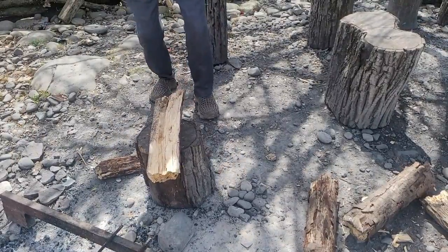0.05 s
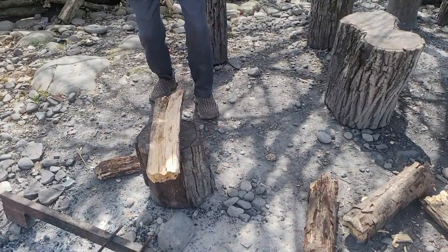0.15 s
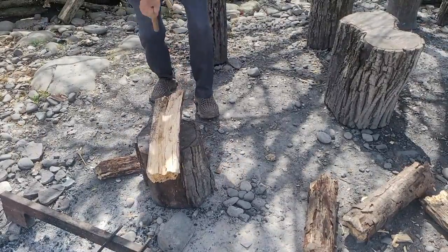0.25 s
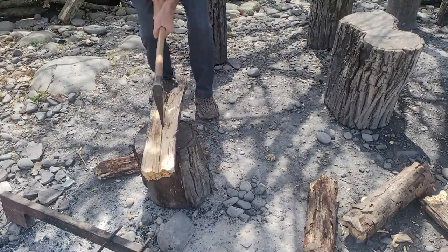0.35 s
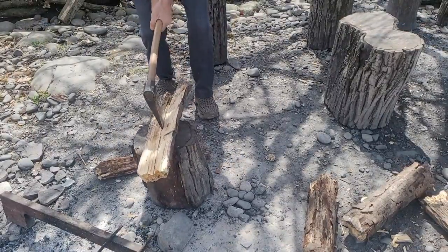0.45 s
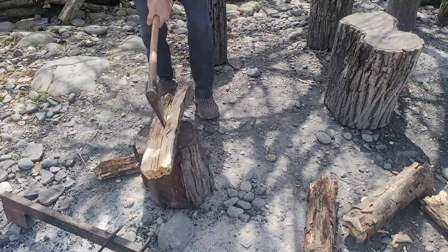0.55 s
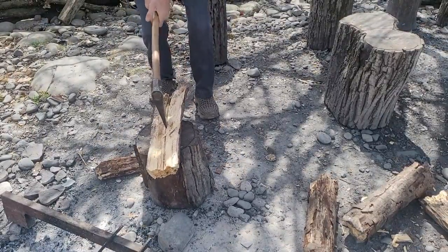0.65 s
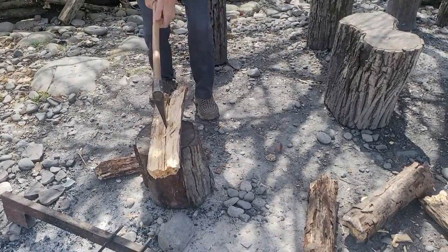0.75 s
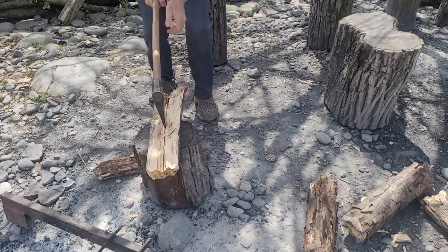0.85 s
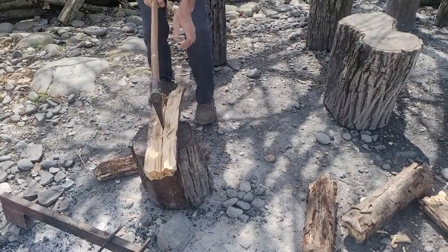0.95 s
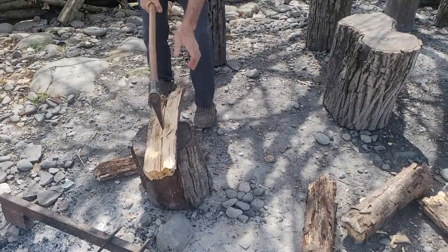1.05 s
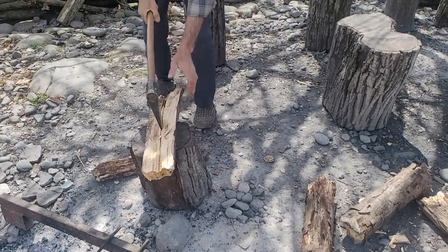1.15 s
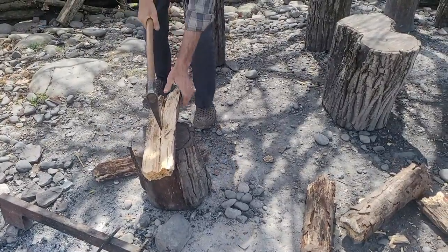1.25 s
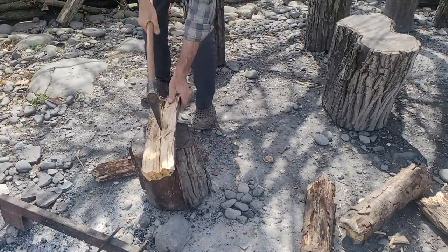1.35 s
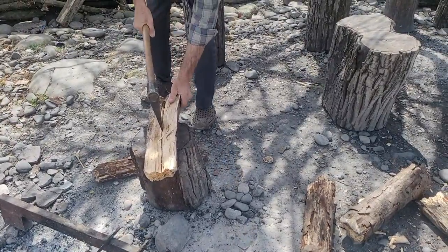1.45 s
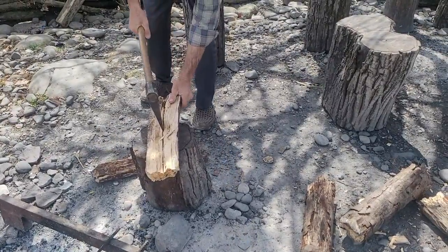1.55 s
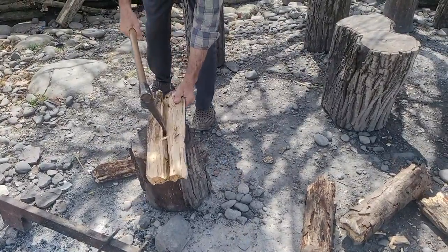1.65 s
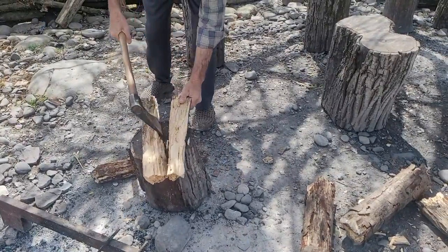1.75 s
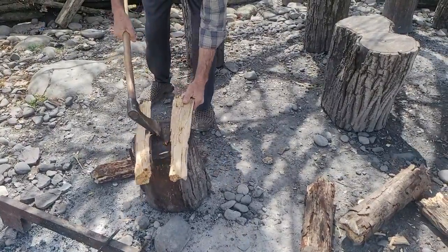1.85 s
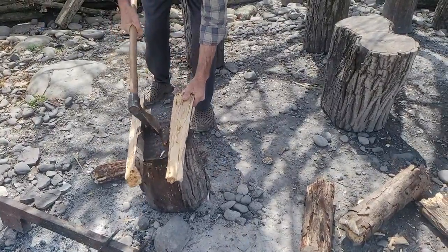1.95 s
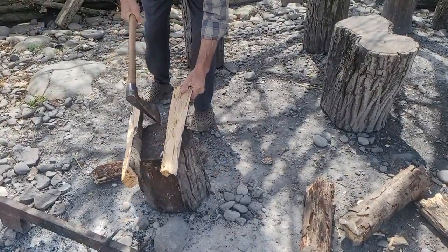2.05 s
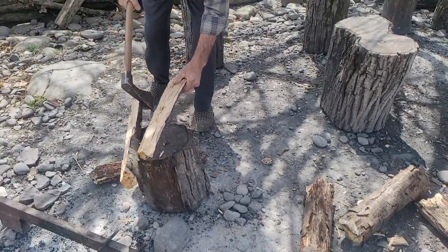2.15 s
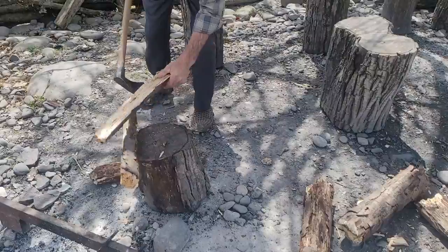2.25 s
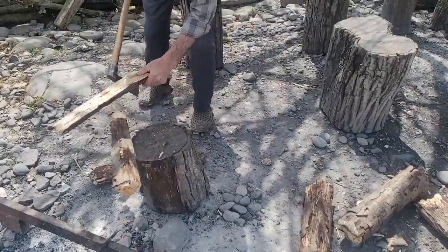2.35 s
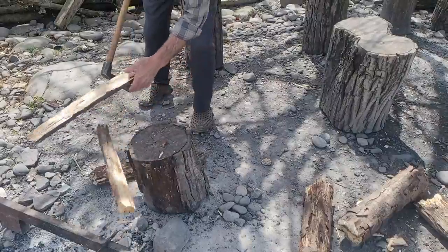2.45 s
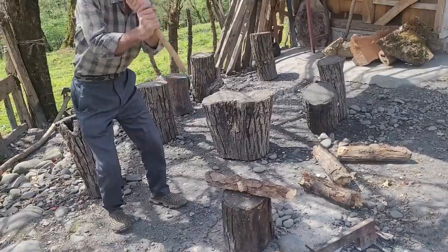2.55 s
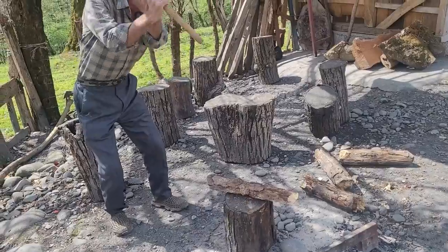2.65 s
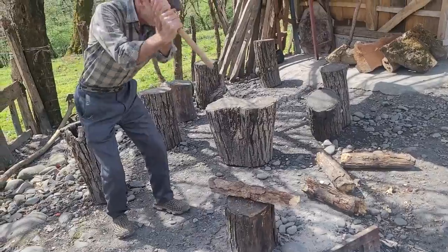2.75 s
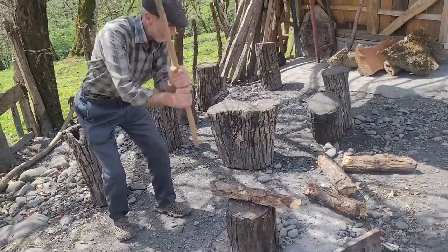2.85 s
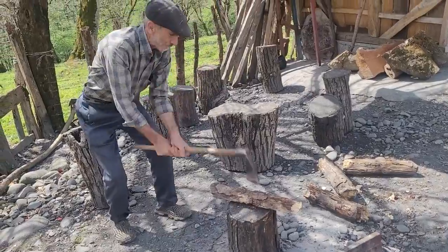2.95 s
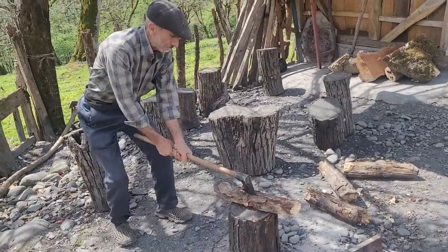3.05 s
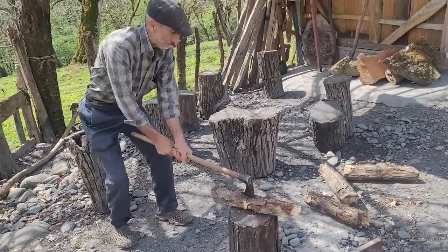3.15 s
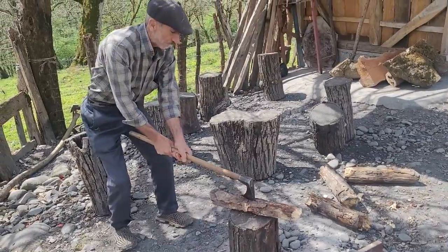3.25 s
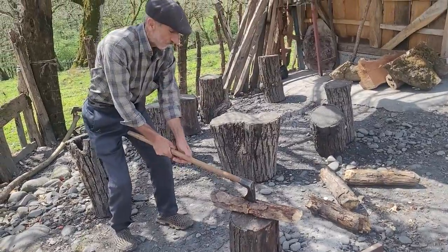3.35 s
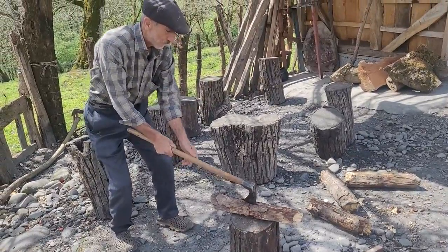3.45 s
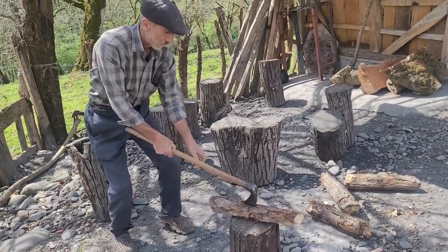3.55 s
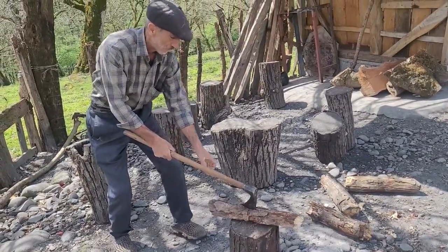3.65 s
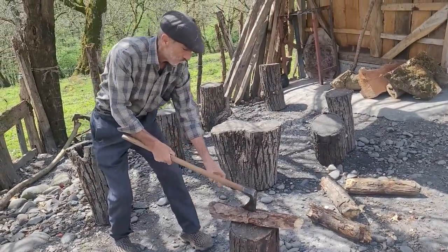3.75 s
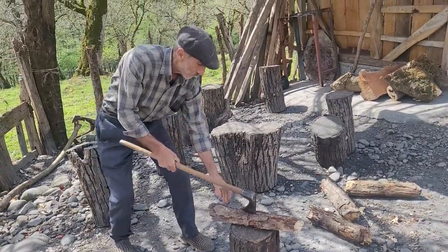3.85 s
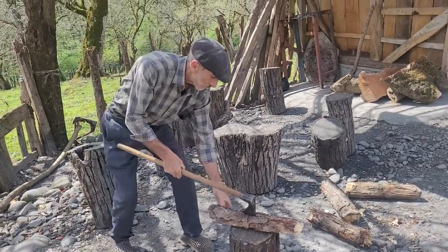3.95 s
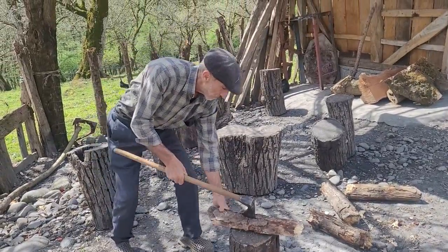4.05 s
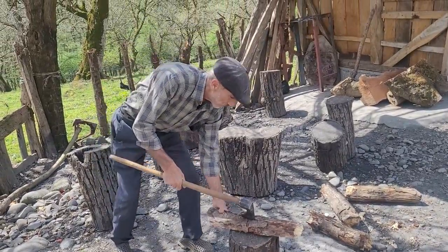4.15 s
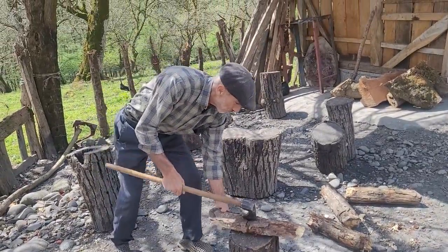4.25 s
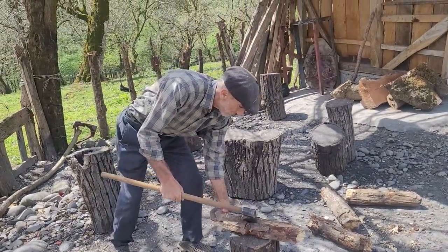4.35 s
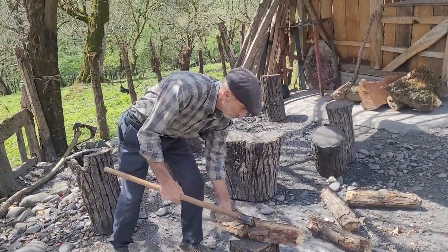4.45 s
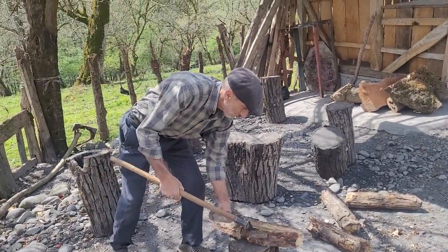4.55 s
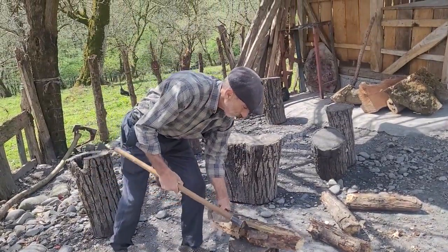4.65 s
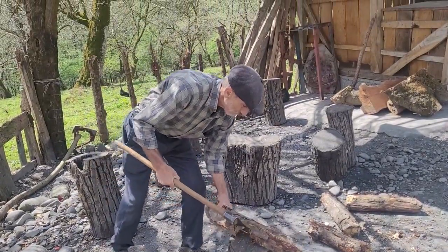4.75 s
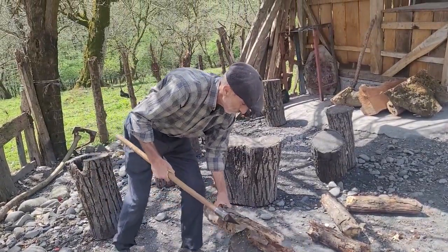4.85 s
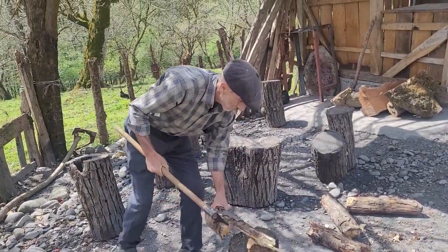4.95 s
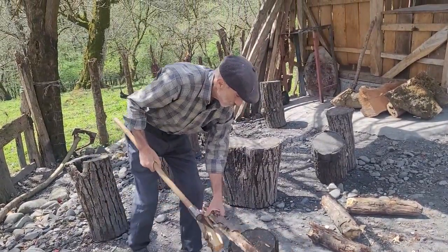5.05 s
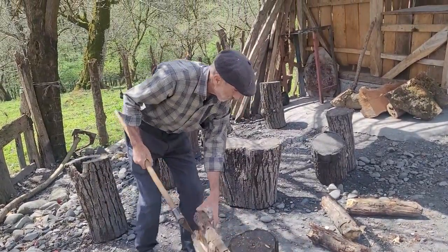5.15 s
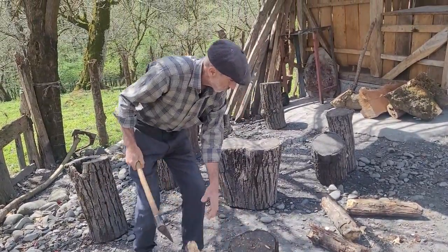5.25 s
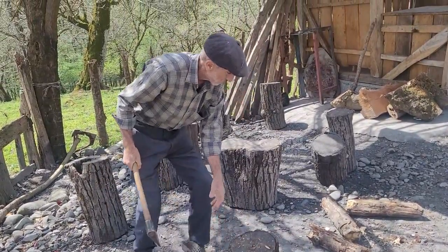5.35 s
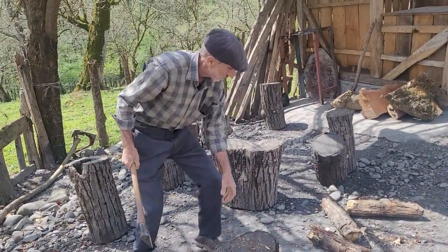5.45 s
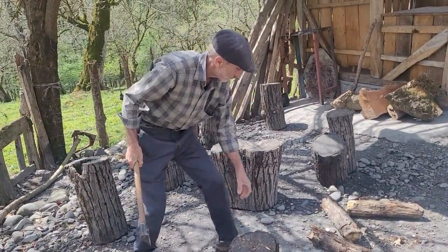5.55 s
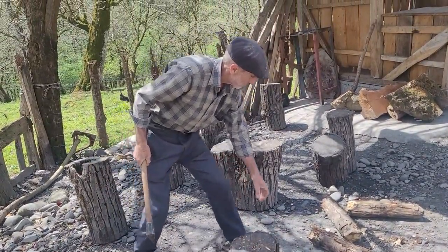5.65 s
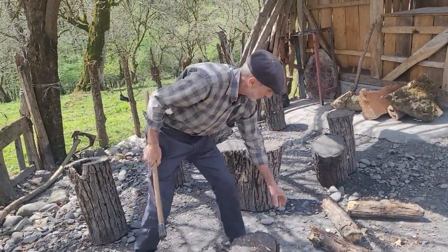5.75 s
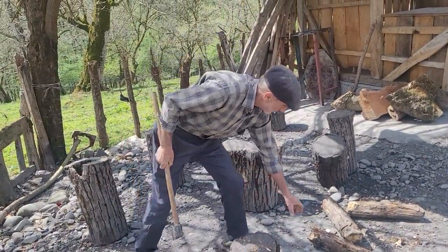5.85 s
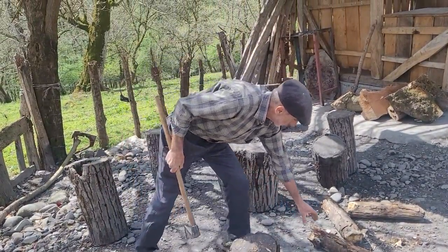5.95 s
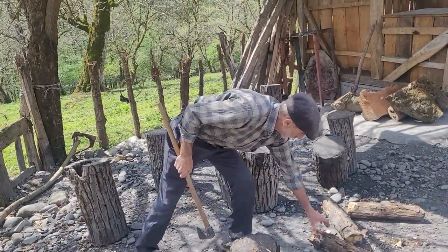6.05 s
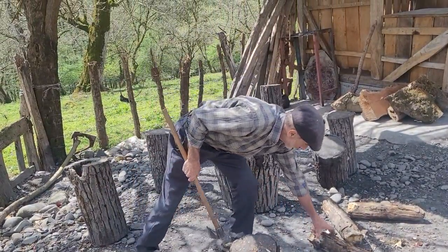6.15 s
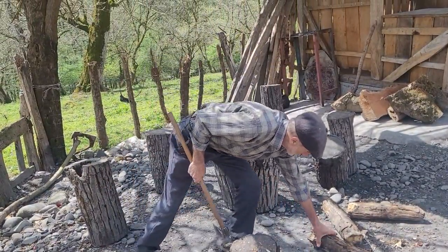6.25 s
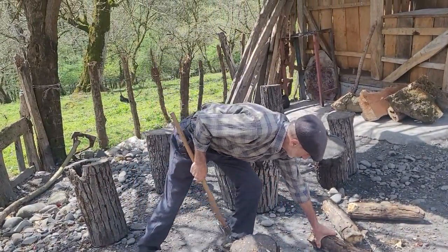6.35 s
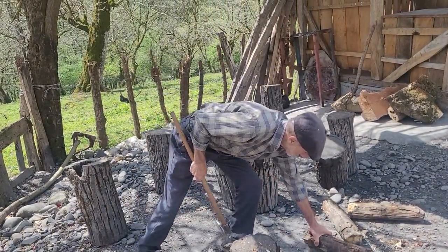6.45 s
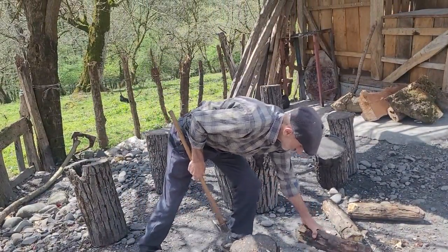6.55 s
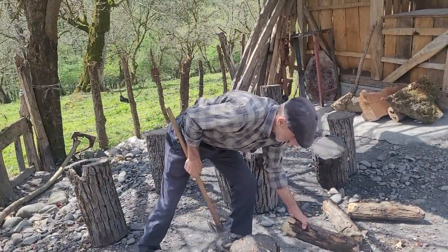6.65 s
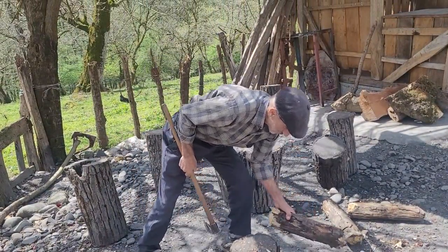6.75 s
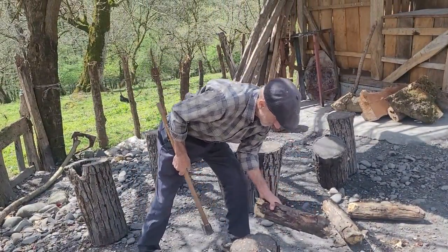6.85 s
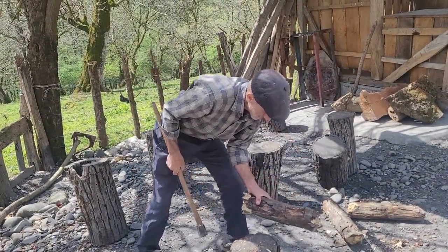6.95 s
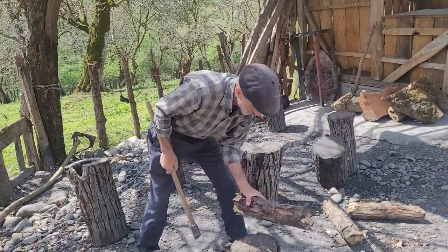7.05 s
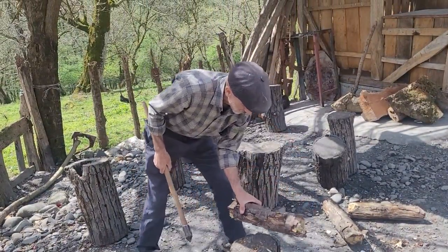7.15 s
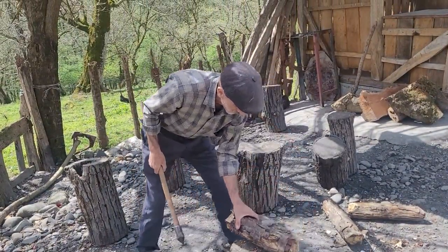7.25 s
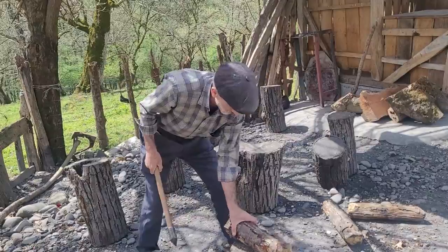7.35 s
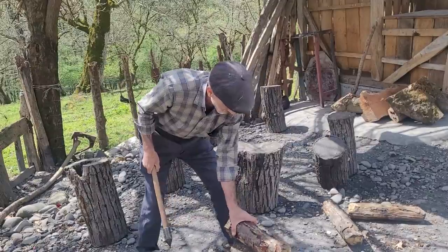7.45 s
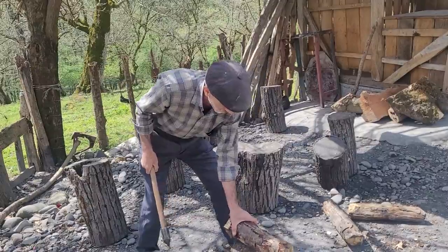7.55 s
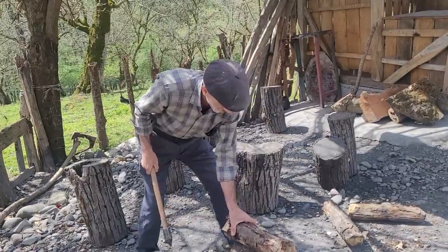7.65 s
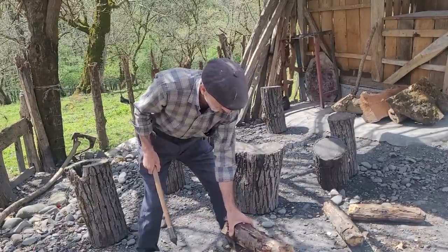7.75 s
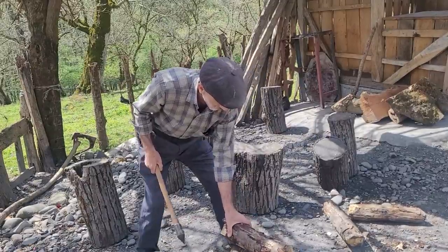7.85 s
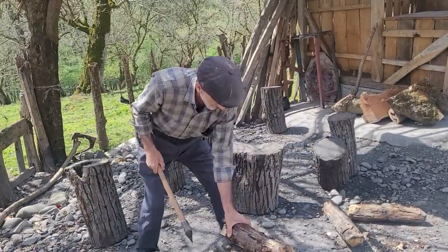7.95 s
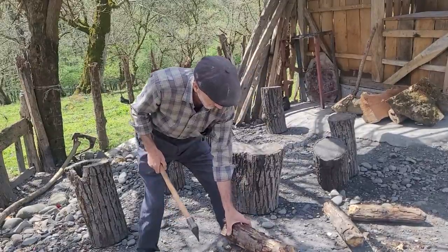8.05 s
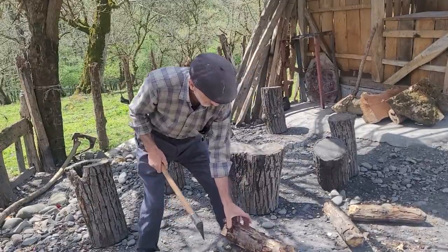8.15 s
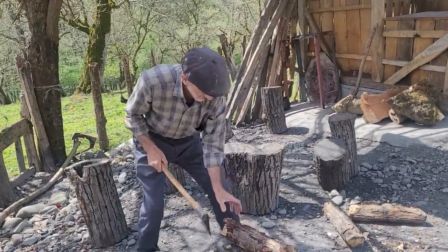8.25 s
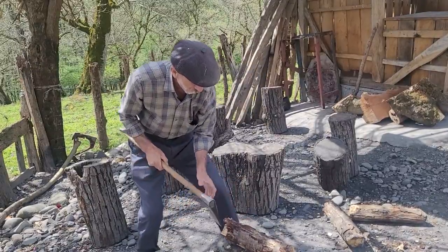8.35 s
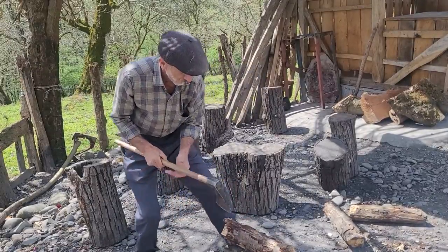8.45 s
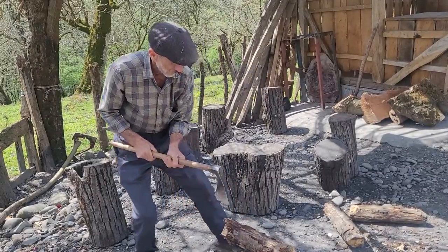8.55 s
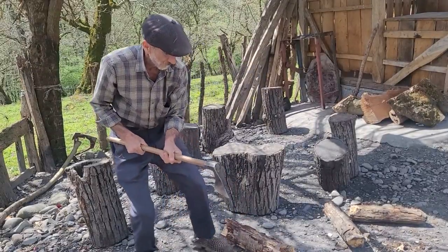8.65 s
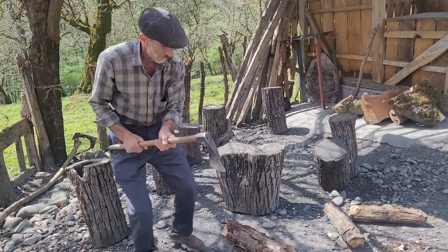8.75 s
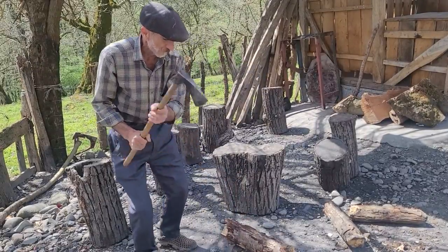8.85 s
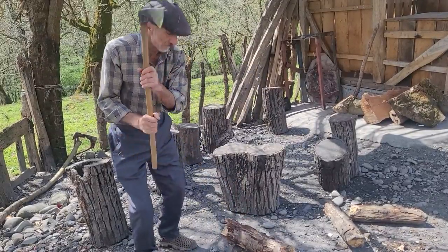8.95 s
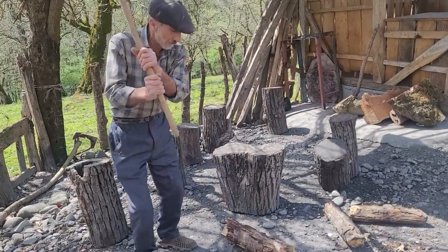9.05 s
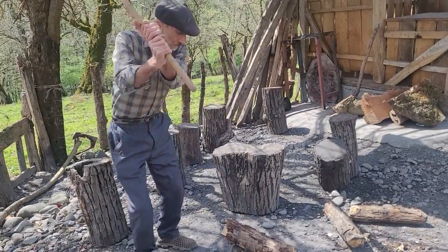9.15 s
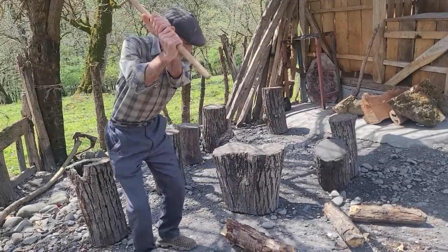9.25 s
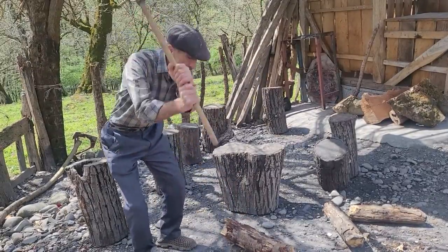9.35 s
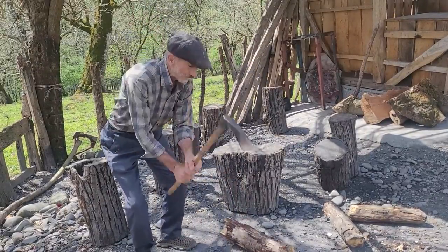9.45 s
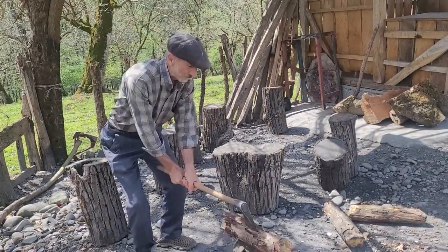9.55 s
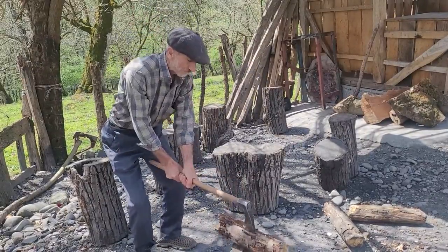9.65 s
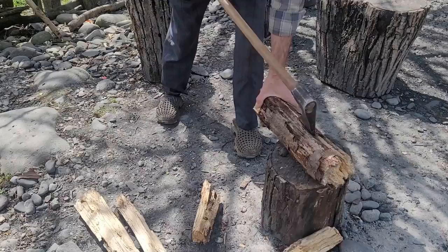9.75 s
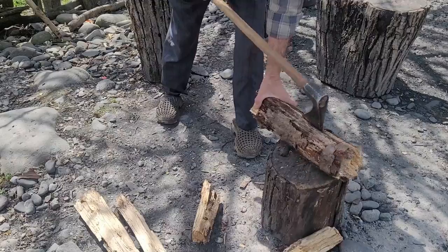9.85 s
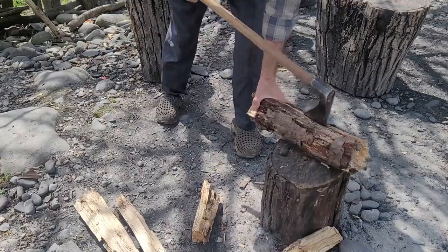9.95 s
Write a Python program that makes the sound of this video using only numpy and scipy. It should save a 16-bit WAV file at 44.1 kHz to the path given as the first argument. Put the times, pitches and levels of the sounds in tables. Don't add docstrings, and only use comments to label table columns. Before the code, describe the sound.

Wood chopping in an open rural yard, heard in stereo from close by, then slightly farther away after the first few seconds. Three full axe blows boom through block and ground with sharp splintering cracks. Between them come creaking rips, log knocks, pebble ticks, dragging and metal clinks. Trilled sparrow chirps repeat about every second, a thin high whistler and humming flies sit behind, over a low breeze.

```python
import sys
import numpy as np
from scipy import signal
from scipy.fft import rfft, irfft, next_fast_len
from scipy.io import wavfile
from scipy.ndimage import uniform_filter1d

SR = 44100
rng = np.random.default_rng(int(sys.argv[2]) if len(sys.argv) > 2 else 0)


def to_linear_factor(level_db):
    exponent = np.asarray(level_db, float) / 20
    return 10 ** exponent


def to_wav(sig):
    pcm = np.clip(np.atleast_2d(sig), -1, 1) * 32767
    pcm = np.round(pcm).astype(np.int16)
    wavfile.write(sys.argv[1], SR, pcm.T)


N = 440559
TIME_S = np.arange(N) / SR
SLOW_S = TIME_S[::16]

# (frequency [Hz], density [dB per Hz])
AIR_SPECTRUM = [(100, -7.5), (250, 1), (700, -0.5), (1400, -26), (2400, -40), (6000, -25), (10000, -31),
                (16000, -44.5)]
# (time [s], level [dB])
STIR_LEVEL = [(0.0, -76), (0.97, -90.5), (1.42, -88), (1.81, -70), (2.1, -87), (2.55, -76), (2.58, -72.5),
              (3.76, -80.5), (4.3, -75.5), (4.55, -73.5), (5.29, -68.5), (6.4, -76), (6.95, -84),
              (7.6, -85), (8.24, -86.5), (8.82, -81), (9.63, -80), (9.77, -82), (9.99, -73.5)]
# (top [s], level [dB], time to fall 20 dB [s])
GUSTS = [(.08, -69.5, 1), (.699, -65.5, 0.1), (1.84, -55, 0.07), (2.44, -58.5, 0.37), (5.85, -64, 0),
         (6.13, -73, 0.44), (9.94, -68, 0.72)]
# (time [s], wingbeat [Hz], partial 1 [dB], partial 2 [dB])
FLY = [(7.2, 290.5, -90, -94.5), (7.8, 293, -84.5, -79.5), (8.3, 285, -81.5, -80), (8.7, 286.7, -73, -86),
       (9.2, 281.6, -76.5, -82.5), (9.5, 283.7, -83.5, -92)]
# (time [s], wingbeat [Hz], partial 1 [dB])
BEE_PASSES = [
    [(0, 661, -74), (.34, 649.5, -76), (1.1, 651, -83)],
    [(1.3, 650, -78), (2.2, 652.5, -69.5), (3.4, 645, -80.5), (4.9, 655, -82.5)],
]
# (time [s], pitch [Hz], level [dB])
WHISTLES = [
    [(.055, 7635, -62), (.085, 6426, -61), (.125, 5330, -63), (.15, 6060, -65), (.18, 5650, -82)],
    [(.24, 6175, -84.5), (.257, 7200, -73.5), (.272, 4555, -69), (.29, 6100, -60.5), (.33, 5114, -72.5)],
    [(.085, 6100, -72), (.1, 6900, -68), (.12, 6300, -74)],
    [(7.01, 7900, -84), (7.04, 6300, -81), (7.1, 5350, -82)],
    [(7.195, 7700, -83), (7.225, 6300, -82), (7.285, 5400, -85)],
]
# (start [s], length [s], start pitch [Hz], end
# pitch [Hz], level [dB])
SEEPS = [(2.257, .19, 8700, 7800, -72), (3.69, .05, 4700, 4300, -75), (4.85, .04, 4900, 4900, -64),
         (6.268, .18, 8800, 8050, -77), (6.52, .19, 8400, 7840, -76), (6.765, .05, 8700, 8500, -76),
         (6.84, .1, 8450, 8120, -76), (6.972, .09, 1600, 1566, -80), (6.977, .11, 4550, 4500, -81.5),
         (8.815, .016, 4250, 4300, -59)]

# (share of length [0-1], pitch [Hz], level [dB])
CHEEP = [(0, 3502, -14), (.055, 3878, -10), (.07, 4415, -2), (.115, 5004, -3.5), (.27, 3959, -4.5),
         (.3, 3820, 4.5), (.68, 3425, -4), (.74, 3220, -14), (1, 2788, -22)]
CHIP = [(0, 4400, -9), (.15, 4880, 2), (.31, 5706, 1), (.45, 4700, 6.5), (.6, 4050, 2.5), (1, 3500, -12)]
CHUP = [(0, 2850, -15), (.25, 3100, -8), (.4, 3300, -4), (.52, 4280, 2.5), (.66, 3500, 3.5),
        (.9, 3360, -6.5), (1, 3200, -14)]
HOOK = [(0, 4025, -8), (.15, 4930, -0.5), (.3, 5094, 1.5), (.5, 4246, 3), (.7, 3980, 0), (1, 3900, -9.5)]
STROKE = [(0, 2830, -3.5), (.6, 3907, -1.5), (.75, 3700, -3), (1, 3150, -5.5)]
LEAD_IN = [(0, 4300, -6), (.5, 4700, -1), (1, 5700, -4.5)]
# (time [s], level [dB])
CHEEPS = [(.004, -36), (1.016, -43), (1.733, -42.5), (2.36, -37.5), (3.023, -42), (4.0, -43.5),
          (5.186, -38), (6.259, -39), (7.15, -40.5), (8.272, -41), (9.595, -41), (9.81, -41.5)]
FAR_CHEEPS = [(1.047, -53), (2.475, -58.5), (1.44, -66), (4.629, -74), (4.9, -59), (5.04, -66), (6.1, -64),
              (7.99, -70), (9.03, -71.5), (9.13, -76.5)]
CHIPS = [(1.889, -50), (2.669, -48.5), (3.369, -50), (5.4, -47), (6.012, -47), (6.749, -51), (9.268, -51.5)]
CHUPS = [(1.119, -58.5), (1.954, -48), (2.734, -53), (3.439, -53.5), (5.469, -48.5), (6.08, -47),
         (6.821, -49.5), (8.069, -67), (9.33, -53)]
HOOKS = [(1.386, -60), (1.444, -54), (4.878, -52), (4.93, -50.5), (5.062, -59), (8.712, -61),
         (8.965, -60.5)]
STROKES = [(1.478, -59), (1.507, -61.5), (1.535, -67), (1.556, -66), (4.918, -56), (4.95, -63.5),
           (4.974, -54), (5.002, -52), (5.09, -62), (5.112, -59.5), (5.14, -59)]
LEAD_S, LEAD_DB = .021, -21.5
# (syllable, starts, length [s], pitch factor, distance [0-1], trill [Hz], trill swing [Hz], trill depth)
CHOIR = [(CHEEP, CHEEPS, .125, 1., .36, 128, 250, .65),
         (LEAD_IN, [(s - LEAD_S, db + LEAD_DB) for s, db in CHEEPS[1:]], .022, 1., .5, 150, 60, .2),
         (CHEEP, FAR_CHEEPS, .1, 1.1, .97, 140, 300, .4), (CHIP, CHIPS, .055, 1., .64, 150, 150, .4),
         (CHUP, CHUPS, .083, 1., .52, 140, 100, .4), (STROKE, STROKES, .036, 1., .6, 150, 30, .2),
         (HOOK, HOOKS, .042, 1., .62, 150, 35, .2)]

# (top [s], level [dB], time to fall 20 dB [s], start pitch [Hz], end pitch [Hz])
SWING = (2.96, -57, .115, 360, 282)
# (time [s], grit [dB], fine grit
# re grit [dB], 60 dB fade [s])
RIPS = [(0.351, -28.5, -7.5, 0.29), (1.618, -40.5, -2, 0.1652), (1.649, -48, 5.5, 0.3766),
        (1.684, -31, 0, 0.0461), (1.69, -38, -16, 0.0656), (2.57, -75.5, 8, 1.7), (3.038, -38, -0.5, 0.26),
        (4.757, -51.5, -10, 0.23), (5.23, -36.5, -18, 0.1), (5.331, -34, -3, 0.09),
        (5.444, -38.5, -17, 0.1), (5.737, -35, -41, 0.1628), (5.801, -56, -23, 0.49),
        (5.864, -50, -29, 0.4), (7.33, -43, 8, 0.073), (9.564, -23.5, -15, 0.0224), (9.58, -43, -7, 0.04)]
# (top [s], grit [dB], fine grit re grit [dB], time to fall 20 dB [s])
DRAGS = [(0.939, -71.5, -19, 0.26), (1.04, -58.5, -10.5, 0.01), (1.38, -67.5, -8, 0.1),
         (1.472, -58.5, -18, -0.03), (3.45, -65, -5.5, -0.03), (3.795, -51.5, -17.5, -0.0068),
         (4.471, -71.5, 2, 0.21), (5.15, -70, -12, -0.27), (5.67, -63.5, -19, 0.5), (5.89, -56, -10, .05),
         (6.02, -63, -8.5, .13), (6.549, -66.5, -2.5, .14), (7.6, -78.5, 5, 0.4), (8.899, -65.5, -19, .08),
         (9.89, -58, -10.5, 0.17)]
# (start [s], end [s], grit [dB], fine grit re grit [dB])
SCUFFS = [(3.613, 3.66, -78, 19), (4.255, 4.378, -56, 3), (6.504, 6.583, -65, -8.5),
          (8.569, 8.687, -69, -26), (8.761, 8.818, -58, -4), (8.816, 8.873, -52.5, -17),
          (8.868, 8.905, -56.5, -9)]
# (centre [Hz], width [Hz], level [dB])
PEBBLES = [(805, 120, -2.5), (1240, 310, 3), (1600, 340, 3), (2300, 200, -0.5), (3200, 2700, 3.5)]
# (time [s], peak [dB], splinter pitch [Hz])
SNAPS = [(.3535, -19.5, 1470), (.458, -52, 1320), (.6801, -54, 1600), (.6968, -54.5, 1263),
         (1.316, -59, 1590), (1.3225, -50.5, 1710), (1.346, -55.5, 1600), (1.619, -20.5, 1555),
         (1.6845, -18.5, 1150), (1.691, -22, 2020), (1.702, -31, 2580), (1.713, -38, 2300),
         (1.8355, -32, 2260), (3.0462, -21.5, 1450), (3.049, -21.5, 4000), (3.1394, -43, 1380),
         (3.432, -55, 1300), (3.495, -57, 1303), (4.7635, -38, 1510), (4.776, -41.5, 1300),
         (5.181, -47, 1540), (5.196, -49, 2230), (5.255, -47, 1500), (5.32, -41.5, 3340),
         (5.353, -33, 1320), (5.36, -40, 1400), (5.448, -29, 1090), (5.634, -62, 2790), (5.644, -56, 3030),
         (5.953, -56, 2735), (6.016, -50, 1510), (6.456, -61, 1730), (6.503, -52, 2790),
         (6.5261, -47, 2297), (7.105, -65, 1813), (7.42, -53, 1300), (7.6669, -52.5, 2813),
         (7.745, -62.5, 1400), (8.452, -65, 1504), (8.7643, -53.5, 1730), (8.7821, -43.5, 1400),
         (8.825, -56, 1690), (8.838, -51, 1499), (8.862, -44, 2310), (8.8782, -41.5, 1720),
         (8.905, -56, 2700), (9.5625, -20.5, 1354), (9.5734, -26, 1320), (9.668, -44, 1150),
         (9.706, -45, 951)]
# (time [s], peak [dB], splinter pitch [Hz])
CLACKS = [(0.35, -24, 1090), (1.0163, -56, 1467), (1.4596, -52, 1467), (1.6503, -32, 2580),
          (1.6723, -26, 2300), (2.0634, -66, 1390), (3.036, -22, 1380), (3.785, -53.5, 1580),
          (5.231, -35.5, 844), (5.2974, -51, 1800), (5.4109, -34, 1770), (5.443, -38, 1680),
          (5.5329, -51, 2680), (5.5474, -46.5, 1080), (5.6714, -55.5, 2830), (5.7107, -45, 2300),
          (5.7405, -56, 1610), (8.5, -70.5, 2800), (9.6907, -45.5, 890)]
# (time [s], peak [dB])
TICKS = [(.517, -46.5), (0.569, -42), (.617, -58), (.821, -56), (1.6186, -20), (1.6204, -31), (1.662, -26),
         (1.72, -49), (1.847, -44.5), (3.032, -15.5), (3.4117, -45.5), (3.523, -56.5), (3.612, -47),
         (3.6265, -41.5), (3.64, -46), (3.655, -47), (4.197, -50), (4.2377, -39), (4.2596, -30),
         (4.274, -39), (4.2925, -24), (4.3115, -29), (4.325, -40), (4.342, -39), (4.372, -42.5),
         (4.449, -50), (4.6676, -50), (4.751, -44), (4.7622, -40.5), (4.775, -41), (4.894, -60),
         (5.3332, -26.5), (6.082, -50.5), (6.572, -45.5), (7.3008, -58.5), (7.3234, -25), (7.339, -35),
         (7.365, -42), (7.55, -58), (7.6, -60), (7.681, -55), (7.7, -61.5), (7.925, -60)]
# (time [s], peak [dB], high modes re low [dB])
CHINKS = [(5.74, -37, 6), (5.745, -36, 0), (5.755, -35.5, 2.5), (5.767, -35, -2), (5.78, -36, -8),
          (5.803, -42, 0.5), (5.825, -54, 0), (5.86, -48, -14), (5.869, -44.5, -8), (5.878, -46, 6),
          (5.904, -53.5, 0)]
# (frequency [Hz], level [dB], ring time [s])
AXE_HEAD_MODES = [(1128, 1, 0.063), (1504, 1, 0.046), (1690, 0, 0.051), (2130, -10, .045),
                  (2675, -3, 0.048), (3030, -4, .09), (3370, -4, .06), (5670, -27, 0.22)]
# (time [s], peak [dB])
TOCKS = [
    (1.839, -42),
    (2.264, -34),
]
# (frequency [Hz], level [dB], ring time [s])
HALF_LOG_MODES = [(541, 1, 0.23), (640, -35, 0.34), (724, -13.5, 0.16), (1320, -12.5, 0.083)]
# (time [s], peak [dB], frequency [Hz])
THUDS = [
    (0.349, -9.5, 84),
    (3.039, -16.5, 77),
    (5.34, -41, 93),
    (7.325, -32.5, 135),
    (9.566, -11.5, 85.6),
]
# (time [s], peak [dB], upper modes re low [dB], ring time [s])
BLOCK_KNOCKS = [(0.3524, -0.5, 8, 0.056), (0.4483, -19.5, -21, 0.044), (1.736, -32.5, -29, .1),
                (1.817, -40, -20, 0.079), (1.835, -24.5, 3.5, 0.04), (3.0451, -4.5, -7, 0.055),
                (4.338, -45, 14.5, 0.12), (4.431, -43.5, -4, 0.12), (5.055, -52.5, -15.5, 0.061),
                (5.293, -38, -10, 0.055), (5.351, -20.5, 9, 0.043), (5.41, -38, 2, .046),
                (5.682, -52, -10, 0.064), (5.871, -40.5, 3, 0.059), (7.326, -18, -10, 0.053),
                (9.5723, -0.5, -12, 0.058), (9.69, -20, -3.5, .07)]
# (time [s], peak [dB], upper modes re low [dB], lowest mode [Hz])
LOG_KNOCKS = [(0.3504, -5.5, 7, 367), (.601, -52, -13, 292), (1.473, -57, 7, 502), (1.684, -37, 25.5, 614),
              (3.0366, -5.5, 8.5, 286), (3.787, -50, -8, 685), (3.804, -53.5, 7, 304),
              (4.775, -56, 13.5, 349), (4.809, -49.5, -22, 594), (5.229, -25, 1, 452),
              (5.339, -20.5, 4.5, 314), (5.449, -23, 10.5, 316), (5.545, -55, -6, 463),
              (5.709, -38.5, -3, 565), (5.745, -31, -18, 471), (8.609, -62, 0, 300), (8.627, -57, -6, 313),
              (9.5588, -15.5, -10, 324), (9.5633, 2, 4, 326)]
BLOCK_HZ = 260.5

MOVE_S = 2.565
SPARROW_PLACES = [(0, 8), (2, .6)]
TEAR_PLACES = [(5.5, 4), (-1, 1.5)]
TICK_PLACES = [(5.5, 4.5), (-1, 4)]
CLACK_PLACES = [(5.5, 4.5), (-0.7, 0.5)]
DULL_PLACES = [(4, -.6), (-2, -.8)]


def band(x, lo_hz, hi_hz, order=2):
    return signal.sosfilt(signal.butter(order, [lo_hz, min(hi_hz, .45 * SR)], "band", fs=SR, output="sos"), x)


def unit(x):
    return x / np.sqrt(np.mean(x ** 2))


def add(track, start_s, sound):
    i = max(int(start_s * SR), 0)
    track[i:i + len(sound)] += sound[:N - i]


def walk(rate_hz):
    k = int(SR / rate_hz)
    steps = np.repeat(rng.standard_normal(N // k + 1), k)[:N]
    return unit(uniform_filter1d(uniform_filter1d(steps, k), k))


def swell(top_s, db, width_s):
    return to_linear_factor(db - 20 * np.abs((SLOW_S - top_s) / width_s) ** 2.3)


def fade(start_s, db, t60_s, rise_s):
    t = np.maximum(SLOW_S - start_s, 0)
    return to_linear_factor(db - 60 * t / t60_s) * (1 - np.exp(-t / rise_s))


def hold(start_s, end_s, db):
    return to_linear_factor(db) * np.clip(np.minimum((SLOW_S - start_s) / 0.011, (end_s - SLOW_S) / 0.0075), 0, 1)


def full(envelope):
    return np.interp(TIME_S, SLOW_S, envelope)


def ring(hz, t60_s, rise_s, phase=0.):
    t = TIME_S[:SR // 2]
    envelope = (1 - np.exp(-t / rise_s)) * np.exp(-np.log(1000) * t / t60_s)
    return envelope * np.sin(2 * np.pi * (hz * t + phase))


def ports(x, lag_samples, pan_db):
    size = next_fast_len(len(x))
    turn = np.exp(-1j * np.pi * np.fft.rfftfreq(size) * lag_samples * np.array([[-1], [1]]))
    return irfft(rfft(x, size) * turn, size)[:, :len(x)] * to_linear_factor(np.array([[pan_db], [-pan_db]]) / 2)


def placed(x, places):
    i = int(MOVE_S * SR)
    return np.hstack([ports(x[:i], *places[0]), ports(x[i:], *places[1])])


def echoes(x, t60_s, gap_s, likeness):
    t = TIME_S[:SR // 2]
    common, left, right = rng.standard_normal((3, len(t)))
    shape = np.exp(-np.log(1000) * t / t60_s) * (1 - np.exp(-t / gap_s))
    lumps = np.repeat(rng.standard_normal(len(t) // 150 + 1), 150)[:len(t)]
    shape *= to_linear_factor(2.5 * lumps)
    out = []
    for own in (left, right):
        tail = shape * (likeness * common + np.sqrt(1 - likeness ** 2) * own)
        out.append(signal.fftconvolve(x, tail / np.sqrt(np.sum(tail ** 2)))[:N])
    return np.array(out)


def stir_db():
    still_db = -79.5
    return np.interp(TIME_S, *np.transpose(STIR_LEVEL)) - still_db


def breeze():
    calm_db, shake_db, shake_t60_s, shake_rise_s = -79.5, -35.5, 0.54, 0.013
    blowing = to_linear_factor(calm_db) + sum(swell(*gust) for gust in GUSTS)
    blowing += sum(fade(s, db + shake_db, shake_t60_s, shake_rise_s) for s, db, _ in THUDS)
    rumble = unit(band(rng.standard_normal((3, N)), 33.0, 78.0))
    return full(blowing) * to_linear_factor(2.0 + 2.0 * walk(3.3)) * (rumble[0] + 0.4 * rumble[1:])


def yard():
    murmur_db = -69 + .18 * stir_db() - .7 * TIME_S
    leaves_db = -76.5 + stir_db()
    air_hz, air_db = np.transpose(AIR_SPECTRUM)
    low, high, lull = 0, 0, walk(4)
    for hz in 110 * 2 ** np.arange(0, 7.3, .5):
        mid, side = band(rng.standard_normal((2, N)), hz / 1.25, hz * 1.25, order=1)
        db = np.interp(np.log(hz), np.log(air_hz), air_db)
        db = db + 2.6 * walk(7) + 2.2 * walk(2.5) + 2.4 * lull
        width = min(hz / 790.0, 1)
        layer = to_linear_factor(db) * (mid + width * side * np.array([[1], [-1]]))
        treble = np.clip(np.log2(hz / 2100.) / 1.2, 0, 1)
        low = low + (1 - treble) * layer
        high = high + treble * layer
    return breeze() + to_linear_factor(murmur_db) * unit(low) + to_linear_factor(leaves_db + 0.5) * unit(high)


def flock():
    out, t = np.zeros(N), TIME_S[:SR // 16]
    for when, top, fall, size in rng.random((900, 4)):
        glide_hz = 3500. + 2300. * top - (430.0 + 770.0 * fall) * t / t[-1]
        hz = glide_hz + 570.0 * np.cos(2 * np.pi * 190.0 * t)
        chirp = np.hanning(len(t)) * np.sin(2 * np.pi * np.cumsum(hz) / SR)
        add(out, when * N / SR, to_linear_factor(6.0 * size) * chirp)
    return to_linear_factor(-75.5 + 0.24 * stir_db()) * unit(echoes(out, 0.13, 0.054, 0.38))


def lines(tables, wobble, rate_hz):
    out, shake = np.zeros(N), walk(rate_hz)
    for table in tables:
        s, hz, *levels = np.transpose(table)
        span = slice(max(int(s[0] * SR), 0), int(s[-1] * SR))
        t = TIME_S[span]
        phase = 2 * np.pi * np.cumsum(np.interp(t, s, hz) * (1 + wobble * shake[span])) / SR
        on = np.clip(np.minimum(t - s[0], s[-1] - t) / .008, 0, 1)
        for partial, db in enumerate(levels, 1):
            out[span] += on * np.sqrt(2) * to_linear_factor(np.interp(t, s, db)) * np.sin(partial * phase)
    return out


def insects():
    return ports(lines([FLY] + BEE_PASSES, 0.0079, 25), 3.0, 1.5)


def whistler():
    seeps = []
    for s, length_s, hz, end_hz, db in SEEPS:
        seeps.append([(s, hz, db), (s + length_s, end_hz, db - 5)])
    whistle = lines(WHISTLES + seeps, 0.0077, 300)
    return ports(whistle, 1.3, 2.8) + to_linear_factor(-3.5) * echoes(whistle, 0.12, 0.0036, .2)


def sparrows():
    near, far = np.zeros(N), np.zeros(N)
    for shape, starts, length_s, pitch, distance, trill_hz, swing_hz, depth in CHOIR:
        share, hz, db = np.transpose(shape)
        t = TIME_S[:int(length_s * SR)]
        glide_hz = pitch * np.interp(t / length_s, share, hz)
        for s, level_db in starts:
            rate_hz = trill_hz * (.85 + .3 * rng.random())
            trill = 2 * np.pi * (rate_hz * t * (1 + .7 * t) + rng.random())
            waver = np.cos(trill) + 2 * uniform_filter1d(rng.standard_normal(len(t)), size=60)
            phase = 2 * np.pi * np.cumsum(glide_hz + swing_hz * waver) / SR
            tone = np.sin(phase) + .01 * np.sin(2 * phase) + .012 * np.sin(3 * phase)
            loudness = to_linear_factor(level_db + np.interp(t / length_s, share, db)) * (1 + depth * np.sin(trill - 1))
            call = loudness * tone * signal.windows.tukey(len(t), .12)
            add(near, s, call * (1 - distance))
            add(far, s, call * distance)
    hedge = 1.45 * echoes(far, .13, .002, .35)
    return placed(near, SPARROW_PLACES) + hedge + to_linear_factor(-13) * echoes(near + far, 0.36, 0.026, 0.18)


def swing():
    top_s, db, width_s, start_hz, end_hz = SWING
    hz = np.interp(TIME_S, [top_s - width_s / 3, top_s + width_s / 10], [start_hz, end_hz])
    tone = np.sin(2 * np.pi * np.cumsum(hz) / SR)
    return full(swell(top_s, db, width_s)) * tone * (1 + .25 * walk(120.))


def tears():
    shape = (len(PEBBLES) + 1, N)
    sizes = to_linear_factor(np.minimum(4.0 * rng.exponential(size=shape), 13)) * (rng.random(shape) < .016)
    grit = signal.lfilter([1], [1, -.97], sizes) * rng.standard_normal(shape)
    coarse = 0
    for clicks, (hz, width_hz, db) in zip(grit, PEBBLES):
        coarse = coarse + to_linear_factor(db) * unit(band(clicks, hz - width_hz / 2, hz + width_hz / 2, order=1))
    coarse = unit(coarse) + to_linear_factor(-8) * unit(band(grit[0] + grit[1], 120., 650.))
    fine = unit(band(grit.sum(axis=0), 1900.0, 16000.0))
    moves = [(fade(s, db, t60_s, 0.0019), fine_db) for s, db, fine_db, t60_s in RIPS]
    moves += [(swell(s, db, width_s), fine_db) for s, db, fine_db, width_s in DRAGS]
    moves += [(hold(start_s, end_s, db), fine_db) for start_s, end_s, db, fine_db in SCUFFS]
    coarse_level = full(sum(move for move, _ in moves))
    fine_level = full(sum(move * to_linear_factor(fine_db) for move, fine_db in moves))
    return coarse * coarse_level + fine * fine_level


def chinks():
    out = np.zeros(N)
    for s, db, high_db in CHINKS:
        for hz, mode_db, t60_s in AXE_HEAD_MODES:
            level_chance, pitch_chance = rng.standard_normal(2)
            level_db = db + mode_db + 2.6 * level_chance + high_db * (hz > 2500)
            add(out, s, to_linear_factor(level_db) * ring(hz * (1 + 0.0254 * pitch_chance), t60_s, 0.00092))
    return out


def snaps():
    fine, coarse, t = np.zeros(N), np.zeros(N), TIME_S[:SR // 10]
    snap_ring_db, clack_ring_db, tick_ring_db, tick_hz = 4, 14.5, -10.5, 1940
    rows = [(s, db, snap_ring_db, hz) for s, db, hz in SNAPS]
    rows += [(s, db, clack_ring_db, hz) for s, db, hz in CLACKS]
    rows += [(s, db, tick_ring_db, tick_hz) for s, db in TICKS]
    for s, db, ring_db, hz in rows:
        length_s = .002 * to_linear_factor(.25 * (db + 40))
        envelope = np.exp(-t / length_s) * (1 - np.exp(-t / 0.0004))
        burst = rng.standard_normal((2, len(t))) * envelope
        add(fine, s, to_linear_factor(db) * burst[0])
        splinter = 2.2 * band(burst[1], .62 * hz, 1.7 * hz, order=1) + .6 * ring(hz, .021, .0004)[:len(t)]
        add(coarse, s, to_linear_factor(db + ring_db) * splinter)
    return 1.6 * band(fine, 2900., 7900.0, order=1), coarse


def struck_wood(hz, t60_s, upper_db):
    phase, t60_s = rng.random(5), max(t60_s, .02)
    low = 2.1 * ring(1.01 * hz, .9 * t60_s, 0.004)
    low += 1.0 * ring(1.19 * hz, 0.7 * t60_s, 0.003, 0.12 * phase[0])
    low += 0.44 * ring(1.62 * hz, 0.55 * t60_s, 0.0016, phase[1])
    if hz == BLOCK_HZ:
        low += 0.26 * ring(.92 * hz, 4.2 * t60_s, 0.0069)
    upper = ring(640. + 40 * phase[2], 0.35 * t60_s, 0.00065)
    upper += 0.4 * ring(790., 0.52 * t60_s, 0.0016, phase[3])
    upper += 0.49 * ring(1330., 0.25 * t60_s, 0.001, phase[4])
    return 0.64 * low + 0.36 * to_linear_factor(upper_db) * upper


def knocks():
    out = np.zeros(N)
    for s, db, upper_db, t60_s in BLOCK_KNOCKS:
        add(out, s - .001, to_linear_factor(db) * struck_wood(BLOCK_HZ, t60_s, upper_db))
    for s, db, upper_db, hz in LOG_KNOCKS:
        t60_s = .029 * to_linear_factor(-0.28 * db)
        add(out, s - .001, to_linear_factor(db) * struck_wood(hz, t60_s, upper_db))
    for s, db in TOCKS:
        for hz, mode_db, t60_s in HALF_LOG_MODES:
            add(out, s, to_linear_factor(db + mode_db) * ring(hz, t60_s, 0.00014))
    for s, db, hz in THUDS:
        add(out, s, to_linear_factor(db) * (ring(.88 * hz, 0.1, .008) + 0.54 * ring(1.3 * hz, 0.13, 0.0044)))
    return out


def chopping():
    tick, clack = snaps()
    clack = clack + chinks()
    tear, dull = tears(), knocks() + swing()
    wood = placed(tick, TICK_PLACES) + placed(clack, CLACK_PLACES)
    wood += placed(tear, TEAR_PLACES) + placed(dull, DULL_PLACES)
    bright = band(tick + clack + tear, 250., 12000., order=1)
    returns = to_linear_factor(-10) * echoes(bright, .26, .002, .2)
    returns *= to_linear_factor(2.5 * (TIME_S > MOVE_S))
    returns += to_linear_factor(-16.0) * echoes(dull, 0.4, 0.0083, .85)
    return wood + returns


def scene():
    return yard() + flock() + insects() + whistler() + sparrows() + chopping()


def band_limit(x):
    return signal.sosfilt(signal.butter(12, 16970, fs=SR, output="sos"), x)


def record(dry):
    bass_cut = signal.butter(2, 42, "high", fs=SR, output="sos")
    top_cut = signal.ellip(8, .2, 60, 15900, fs=SR, output="sos")
    rounded = np.tanh(0.99 * signal.sosfilt(bass_cut, dry)) / 0.89
    return band_limit(signal.sosfilt(top_cut, rounded))


dry = scene()
out = record(dry)
to_wav(out)
```